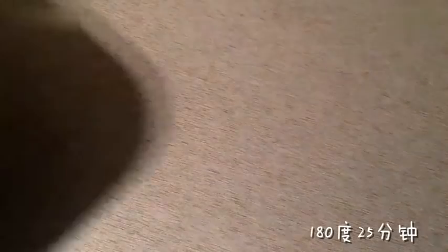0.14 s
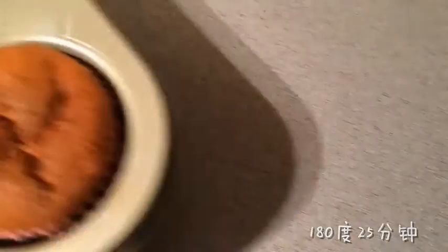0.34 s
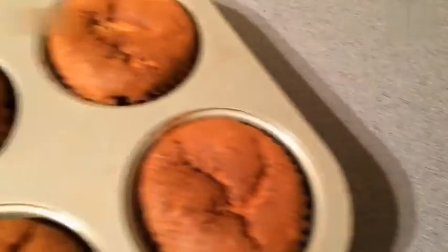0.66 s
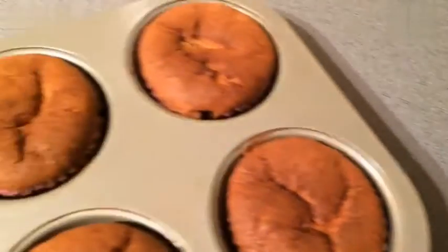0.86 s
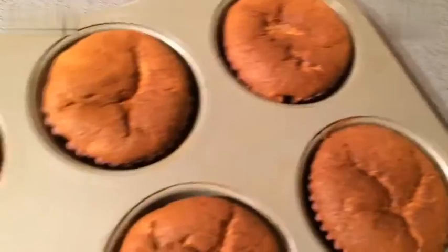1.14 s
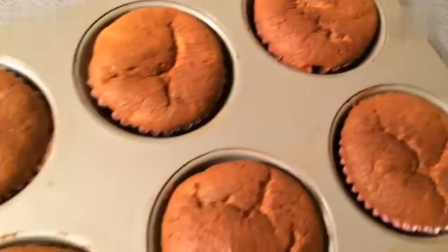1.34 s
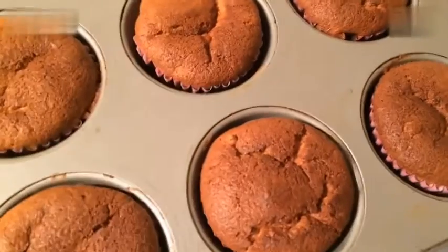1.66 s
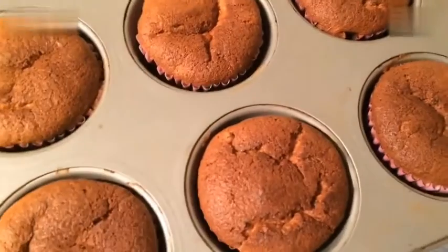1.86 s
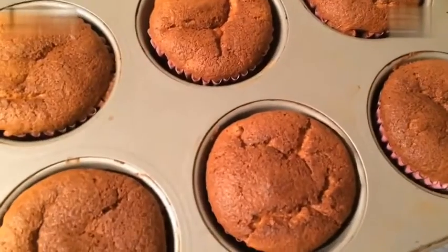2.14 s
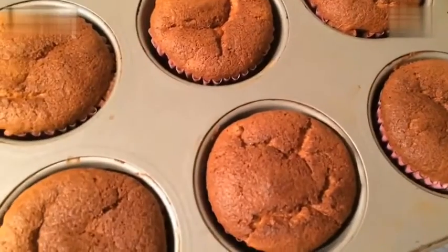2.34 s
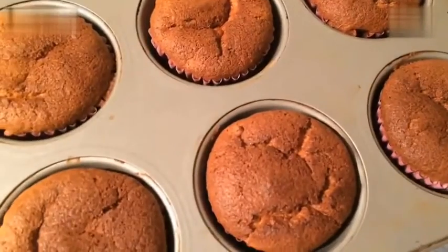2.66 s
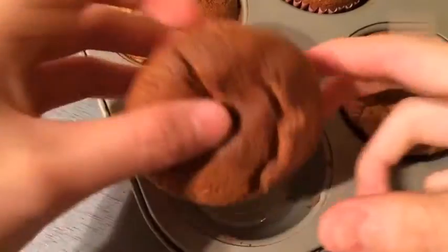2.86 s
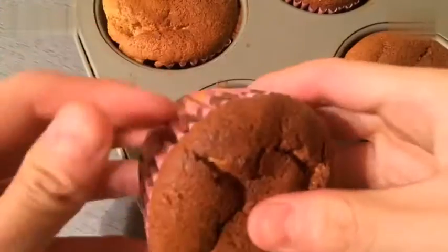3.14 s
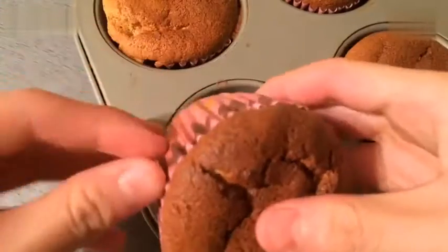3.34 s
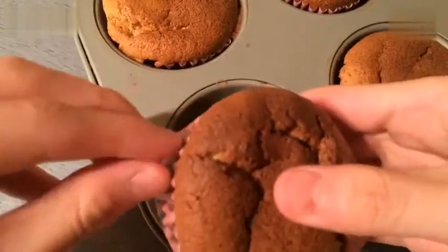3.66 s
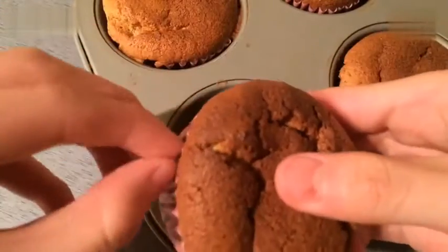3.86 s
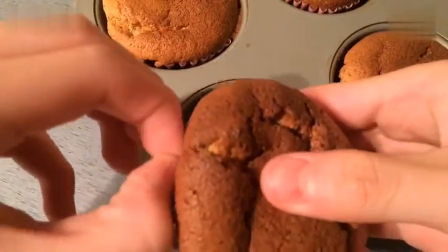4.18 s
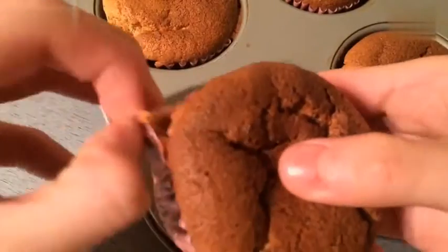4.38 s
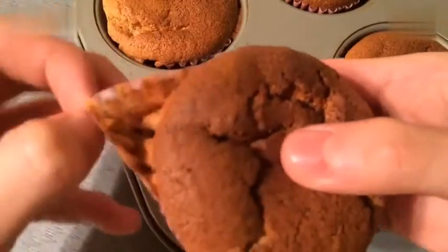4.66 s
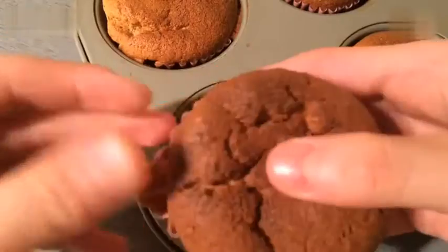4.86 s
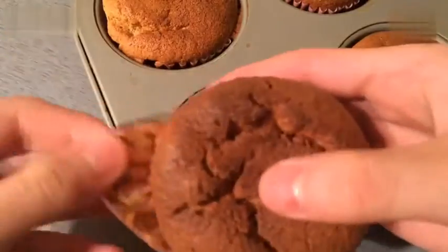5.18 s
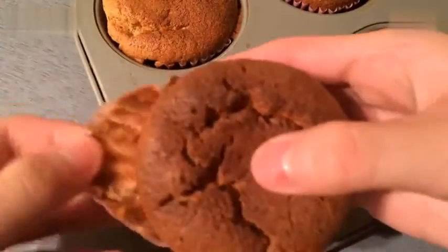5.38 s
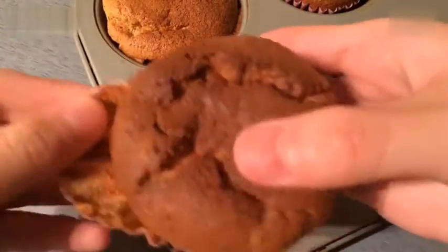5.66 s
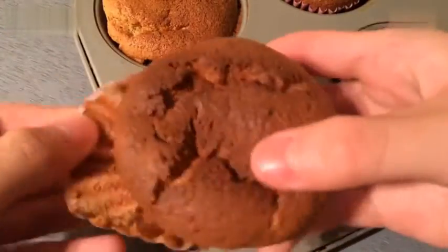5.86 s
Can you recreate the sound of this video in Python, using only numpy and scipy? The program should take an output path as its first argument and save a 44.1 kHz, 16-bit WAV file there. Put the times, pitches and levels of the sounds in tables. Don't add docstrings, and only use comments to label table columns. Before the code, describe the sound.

A quiet kitchen hum, low with faint appliance tones, runs throughout. At about 1.0 s a metal baking pan hits the counter with a hard, clanking knock, short rim ring and boomy slab, loud enough to distort the close microphone. Gritty scraping follows at once, with thin wavering sheet-metal ringing above it; a second clattering double knock comes at 1.34 s and the drag continues until about 1.9 s. A brief rustle and rumble lead to a third bang at 2.12 s, then a light nudge. Two soft low thumps fall around 2.6-2.7 s. From 2.8 to 4.1 s there are only faint paper brushes and tiny ticks. From 4.2 s dry ticks cluster and the liner peels in fizzing, crinkling pulls, with a firm crackling tear and thump at 4.94 s. Brighter snaps and short rips come at 5.3-5.6 s, then smaller crackles until about 5.9 s.

```python
import sys
import numpy as np
from scipy import signal
from scipy.fft import rfft, irfft, next_fast_len
from scipy.io import wavfile
from scipy.ndimage import uniform_filter1d, map_coordinates

SR = 44100
rng = np.random.default_rng(int(sys.argv[2]) if len(sys.argv) > 2 else 0)


def bounce(signal):
    frames = np.transpose(np.atleast_2d(signal))
    limited = np.clip(frames, -1, 1)
    pcm = np.round(limited * 32767).astype(np.int16)
    wavfile.write(sys.argv[1], SR, pcm)


def attenuation_scalar(level_db):
    decades = np.asarray(level_db, float) / 20
    return 10 ** decades


N = 265041

# pitch in Hz, level in dB, t60 in seconds.
COUNTER_MODES = [(42, -14, .2), (68, -10, 0.5), (114, -5, .3), (167, -9.5, .24), (197, -3, 0.38),
                 (325, -6, 0.24)]


def evened(x):
    return x / np.sqrt(np.mean(x ** 2) + 1e-20)


def coloured(x, points):
    hz, db = np.transpose(points)
    size = next_fast_len(len(x))
    f = np.fft.rfftfreq(size, 1 / SR)
    gain = attenuation_scalar(np.interp(np.log(f + 1), np.log(hz + 1), db))
    return irfft(rfft(x, size) * gain, size)[:len(x)]


def curve(rows, axis):
    rows = np.array(rows)
    return np.interp(np.arange(N) / SR, rows[:, 0], rows[:, axis], left=-150, right=-150)


def strokes(rows, axis, fall_db_per_s):
    t = np.arange(N) / SR
    levels = []
    for row in rows:
        full_s, let_go_s, rise_s = row[:3]
        rise_db = 20 * np.maximum(full_s - t, 0) / rise_s
        fall_db = fall_db_per_s * np.maximum(t - let_go_s, 0)
        levels.append(row[axis] - rise_db - fall_db)
    return np.max(levels, 0)


def resonate(x, hz, width_hz):
    return signal.lfilter(*signal.iirpeak(min(hz, .45 * SR), hz / width_hz, SR), x)


def ring(hz, t60, seconds):
    t = np.arange(round(seconds * SR)) / SR
    return attenuation_scalar(-60 * t / t60) * np.sin(2 * np.pi * hz * t)


def add(mix, s, sound):
    part = mix[round(s * SR):][:len(sound)]
    part += sound[:len(part)]


def grains(per_s, spread_db, clump_db):
    size = attenuation_scalar(spread_db * np.minimum(rng.exponential(1, N), 5)) * rng.standard_normal(N)
    clumps = evened(uniform_filter1d(rng.standard_normal(N), 200))
    return evened(size * (rng.random(N) < per_s / SR) * attenuation_scalar(clump_db * clumps))


def kitchen():
    # frequency in Hz, level in dB per Hz.
    hum_spectrum = [(12, -32.5), (20, -4), (58, -1), (91, -0.5), (164, -11), (184, -18.5), (304, -17),
                    (340, -14.5), (403, -15.5), (726, -21.5), (1310, -21), (2170, -25), (2360, -28),
                    (14600, -29), (16400, -58.5)]
    # pitch in Hz, width in Hz, level in dB.
    whine = [(168.7, 11, -71.5), (256.1, 6.9, -74.5), (302, 5.5, -73.5), (403.2, 6, -76.5)]
    # full at s, let go at s, rise in s per 20 dB, gain in dB.
    swell = [
        (1.6, 2.0, 1.1, 11.5),
    ]
    hum = attenuation_scalar(-59) * evened(coloured(rng.standard_normal(N), hum_spectrum))
    low = signal.lfilter(*signal.butter(1, 250, fs=SR), hum)
    swell_db = np.maximum(strokes(swell, axis=3, fall_db_per_s=19), 0)
    tones = sum(attenuation_scalar(db) * evened(resonate(rng.standard_normal(N), hz, width)) for hz, width, db in whine)
    return hum + (attenuation_scalar(swell_db) - 1) * low + tones


def slab_modes(count=260):
    # pitch in Hz, level in dB, t60 in seconds.
    slab = [(89.8, -15, 0.36), (199, -10, .32), (396, -4.5, .24), (602, -3.5, .15), (900, -3.5, 0.12),
            (1400, -8.5, 0.11), (2460, -16.5, .14), (3500, -30, .1), (6000, -34, .06)]
    f, db, t60 = np.transpose(slab)
    crowd = np.geomspace(f[0], f[-1], count) * rng.uniform(0.91, 1.03, count)
    small = [(hz, np.interp(hz, f, db) - 8.0, np.interp(hz, f, t60)) for hz in crowd]
    return np.array([attenuation_scalar(d) * ring(hz, t, seconds=.5) for hz, d, t in COUNTER_MODES + small])


def knocks():
    # time in s, peak in dB, rim pitch in Hz, boom in dB, tick in dB.
    blows = [(0.993, -41, 900, -10, -40), (1.003, -35.5, 900, -7, -41), (1.012, -26, 936.6, -10, -38.5),
             (1.0158, 9, 935, -15.5, -36), (1.041, -6.5, 730, -20.5, -43), (1.057, -16, 810, -14, -39),
             (1.3358, 6.5, 940, -11.5, -45.5), (1.3469, 4, 900, -25, -45), (1.3395, -6, 560, -14, -45),
             (1.372, -16.5, 540, -13, -41.5), (1.3787, -16.5, 785, -17.5, -34),
             (1.4305, -5, 900, -15.5, -50), (1.4335, -12.5, 783, -18, -45), (1.4608, -10, 760, -18, -48),
             (2.1196, -2.5, 902, -12, -52.5), (2.1249, 6.5, 880, -17, -37), (2.127, -5, 306.4, -4, -48),
             (2.1353, -13, 842.4, -19.5, -41.5)]
    out, modes = np.zeros(N), slab_modes()
    t = np.arange(modes.shape[1]) / SR
    for s, db, hz, boom_db, tick_db in blows:
        spot = rng.standard_normal(len(modes))
        t60 = .045 * attenuation_scalar(.6 * boom_db)
        sharp = attenuation_scalar(0.39 * min(db, 0))
        low_rim = ring(hz, t60, .1) + 0.35 * ring(hz * 1.5, 0.709 * t60, .1)
        high_rim = 0.16 * ring(hz * 2.2, t60, .1) + 0.045 * ring(hz * 3.4, 1.3 * t60, .1)
        rim = low_rim + sharp * high_rim
        add(out, s, attenuation_scalar(db) * rim * (1 - np.exp(-t[:len(rim)] / 0.00044)))
        weights = np.sign(spot) * attenuation_scalar(2.5 * spot[::-1])
        weights[:len(COUNTER_MODES)] = 1
        swing = 1 - np.exp(-t / 0.0034)
        add(out, s, attenuation_scalar(db + boom_db - 11.5) * (weights @ modes) * swing)
        add(out, s, attenuation_scalar(db + tick_db) * spot * np.exp(-t[:len(spot)] / 0.003))
    return out


def sheet_ringing(grit, pressure_db, start_s):
    # pitch in Hz, width in Hz, level in dB.
    pan_modes = [(2320, 78, 5), (2990, 70, 4.5), (4990, 110, 0.5), (5870, 71, -1.5), (6040, 60, -10.5),
                 (7340, 85, -1.5), (8580, 180, 3), (10000, 250, -3.5), (11900, 100, -7), (12700, 150, -4),
                 (13830, 200, -12.5)]
    # frequency in Hz, level in dB per Hz.
    sheen = [(2000, -29), (4000, -4.5), (9000, -3), (14400, -5.5), (16400, -30)]
    swells = uniform_filter1d(rng.standard_normal((len(pan_modes), N)), 6000)
    modes = np.zeros(N)
    for (hz, width, db), swell in zip(pan_modes, swells):
        tone = evened(resonate(resonate(grit, hz, 2 * width), hz, 1.15 * width))
        modes += attenuation_scalar(db + 2.8 * evened(swell)) * tone
    asleep = np.exp(-abs(np.arange(N) / SR - start_s) / .15)
    pace = 1 - .025 * asleep + .0025 * evened(uniform_filter1d(swells[0], 2000))
    bent = evened(map_coordinates(modes, [np.cumsum(pace)], mode="wrap"))
    sheet = bent + attenuation_scalar(-6.0) * evened(coloured(grit, sheen))
    extra_db = .35 * (pressure_db + 40)
    return attenuation_scalar(pressure_db + extra_db - 8 * asleep - 14) * sheet


def drag():
    # time in s, pressure in dB.
    pressure = [(1.0, -59), (1.03, -35.5), (1.2, -43), (1.34, -36.5), (1.52, -39.5), (1.68, -42.5),
                (1.8, -40), (1.895, -43), (1.935, -66)]
    # full at s, let go at s, rise in s per 20 dB, pressure in dB.
    nudges = [
        (1.96, 2.2, .05, -69),
        (2.22, 2.385, .1, -56),
        (2.481, 2.5, .004, -60),
    ]
    # frequency in Hz, level in dB per Hz.
    grit_spectrum = [(60, -32), (110, -9), (160, -23), (300, -10.5), (700, -4), (870, -1), (1050, -7.5),
                     (1300, -8.5), (1700, -16.5), (2300, -16), (3900, -36.5), (16400, -61)]
    grit = grains(20000, spread_db=1.5, clump_db=1.8)
    lumps = attenuation_scalar(0.96 * evened(uniform_filter1d(rng.standard_normal(N), 1500)))
    pressure_db = curve(pressure, axis=1)
    scrape_db = np.maximum(pressure_db, strokes(nudges, axis=3, fall_db_per_s=170))
    scrape = attenuation_scalar(scrape_db) * lumps * evened(coloured(grit, grit_spectrum))
    return scrape + sheet_ringing(grit, pressure_db, start_s=pressure[0][0])


def shift():
    # full at s, let go at s, rise in s per 20 dB, rustle in dB, rumble in dB.
    moves = [
        (1.93, 2.1, .01, -85, -48.5),
        (1.954, 1.975, .002, -52.5, -60),
        (1.98, 2.05, .05, -55, -60),
        (2.112, 2.128, .09, -51, -43.5),
        (2.482, 2.55, .004, -66, -95),
    ]
    # frequency in Hz, level in dB per Hz.
    rustle_spectrum = [(180, -29), (300, -9.5), (741, -5.5), (861, -2), (1680, -15), (1920, -19),
                       (8520, -16.5), (14300, -12.5), (16400, -45.5)]
    # pitch in Hz, width in Hz, level in dB.
    squeaks = [(2366, 50, -6), (3380, 40, -4), (3570, 60, -6), (4800, 80, -9.5)]
    rub = grains(15000, spread_db=0.0, clump_db=2.5)
    rings = sum(attenuation_scalar(db - 8.0) * evened(resonate(rub, hz, width)) for hz, width, db in squeaks)
    rustle = evened(coloured(rub, rustle_spectrum)) + rings
    rumble = evened(resonate(rng.standard_normal(N), 113, 40))
    rustle_gain = attenuation_scalar(strokes(moves, axis=3, fall_db_per_s=330))
    rumble_gain = attenuation_scalar(strokes(moves, axis=4, fall_db_per_s=330))
    return rustle_gain * rustle + rumble_gain * rumble


def snaps():
    # time in s, peak in dB, low part in dB, pitch in Hz.
    flips = [(1.951, -36, -10, 980), (3.1624, -53, -8, 1880), (3.8588, -51, -1, 1840),
             (4.156, -48, -9, 997), (4.211, -47, -8, 1340), (4.537, -42, -5, 1390), (4.6214, -49, 7, 1400),
             (4.6606, -50, -7, 2500), (4.8644, -47, -8, 2550), (4.9342, -39, 3, 1400),
             (4.9346, -50, 13, 330), (4.9356, -41, 0, 1400), (5.2524, -53, 1, 997), (5.2944, -33, -2, 2600),
             (5.2952, -42, 4, 1300), (5.3617, -34, 3, 3350), (5.3636, -27.5, -13, 1500),
             (5.4145, -38, 2, 1680), (5.4614, -44.5, 1, 1690), (5.4857, -41.5, -12, 1620),
             (5.5846, -42, -6, 1670), (5.607, -26.5, 1, 1650), (5.6075, -34, 6, 1050),
             (5.6235, -44.5, 2, 1640), (5.7518, -46, -2, 1570), (5.7599, -46, -7.5, 1480),
             (5.7743, -40, -1.5, 1524), (5.8132, -37, -6, 1150), (5.867, -49.5, -2, 1030)]
    # time in s, peak in dB.
    ticks = [(3.3744, -46.5), (4.1847, -47), (4.221, -44.5), (4.2429, -41), (4.264, -43), (4.297, -42),
             (4.3261, -41), (4.332, -41), (4.455, -43), (4.5824, -55), (5.5608, -47)]
    pleat = [(.6, .35), (1, 1), (2.0, .85)]
    out, t = np.zeros(N), np.arange(1500) / SR
    crack_band = signal.butter(1, [2500, 11000], "band", fs=SR)
    for s, db, low_db, hz in sorted(flips + [(s, db, -21, 2600) for s, db in ticks]):
        noise = signal.lfilter(*crack_band, rng.standard_normal(len(t)))
        crack = noise * np.exp(-t / .0006)
        afterslip = attenuation_scalar(-15) * noise * np.exp(-t / .009)
        add(out, s, attenuation_scalar(db) * (crack / abs(crack).max() + afterslip))
        body = sum(share * ring(hz * ratio, .009, .03) for ratio, share in pleat)
        body = signal.lfilter(*signal.butter(2, .45 * hz, "high", fs=SR), -body)
        add(out, s, attenuation_scalar(db + low_db + 2.5) * body)
    return out


def crumb_and_pleats():
    # frequency in Hz, level in dB per Hz.
    fizz_spectrum = [(1180, -8), (2000, -28), (2600, 1), (3020, -8), (3330, -3), (14300, 6.5), (15900, 1.5),
                     (16400, -34)]
    # pitch in Hz, width in Hz, level in dB.
    cup = [(1436, 57, 16), (1765, 30, 19), (2080, 110, 9.5), (3090, 62, 17.5), (2700, 60, 16),
           (5090, 100, 14)]
    fizz = evened(coloured(grains(16000, spread_db=1.9, clump_db=2.0), fizz_spectrum))
    coarse = grains(6000, spread_db=2.4, clump_db=2.4)
    crinkle = sum(attenuation_scalar(db) * evened(resonate(coarse, hz, width + 400)) for hz, width, db in cup)
    return fizz, evened(crinkle)


def peel(fizz, crinkle):
    # full at s, let go at s, rise in s per 20 dB, fizz in dB, low crinkle in dB.
    pulls = [(2.6, 2.605, .003, -58.5, -73), (3.15, 6.1, .3, -75, -77), (3.33, 3.49, .45, -69, -71),
             (4.2, 4.33, .14, -59, -73), (4.335, 4.345, .1, -66, -62), (4.37, 4.42, .05, -62, -75),
             (4.46, 4.525, .12, -54, -68), (4.538, 4.556, .004, -49, -49), (4.57, 4.66, .05, -56, -66),
             (4.67, 4.79, .08, -54, -58), (4.8, 4.88, .1, -61, -62), (4.975, 4.985, .05, -54, -63),
             (5.255, 5.31, .03, -62, -59), (5.365, 5.385, .008, -48.5, -51), (5.43, 5.505, .3, -53.5, -50),
             (5.74, 5.82, .07, -61, -59), (5.83, 5.88, .1, -63, -67)]
    fizz_gain = attenuation_scalar(strokes(pulls, axis=3, fall_db_per_s=300))
    crinkle_gain = attenuation_scalar(strokes(pulls, axis=4, fall_db_per_s=300))
    return fizz_gain * fizz + crinkle_gain * crinkle


def thumps():
    # time in s, peak in dB, pitch in Hz, t60 in seconds.
    pushes = [
        (2.609, -40, 76.4, 0.11),
        (2.713, -37.5, 80, 0.099),
        (4.419, -51, 70.0, 0.15),
        (4.618, -51, 81.6, 0.15),
        (4.936, -40, 122.4, 0.062),
        (5.293, -51, 85, 0.1),
    ]
    out = np.zeros(N)
    onset = 1 - np.exp(-np.arange(round(.4 * SR)) / SR / 0.017)
    for s, db, hz, t60 in pushes:
        add(out, s, attenuation_scalar(db + 8.0) * ring(hz, t60, .4) * onset)
    return out


def tears(fizz, crinkle):
    # start in s, end in s, level in dB, low crinkle in dB, brightest frequency in Hz.
    bursts = [(2.81, 2.85, -68.5, -10, 12500), (2.85, 2.9, -72, -15, 11050),
              (3.05, 3.072, -67.5, -0.5, 3600), (3.12, 3.158, -68, -7, 8000),
              (3.261, 3.317, -58.5, -3, 4600), (3.37, 3.388, -60, -17.5, 6240),
              (3.593, 3.614, -52.5, -13, 6000), (3.683, 3.75, -66, -5.5, 6000),
              (3.772, 3.788, -58.5, -8.5, 6000), (3.835, 3.867, -58, -7.5, 5500),
              (3.9, 3.921, -64, -2, 3980), (3.993, 4.035, -58.5, -10, 5000), (4.938, 4.975, -43, -3, 6700),
              (5.107, 5.162, -60, -6, 3800), (5.178, 5.213, -64.5, 1.5, 3820), (5.398, 5.414, -56, 3, 3500),
              (5.424, 5.438, -56, 5, 3500), (5.611, 5.63, -56.5, 6, 3990), (5.294, 5.299, -43, -11, 13000),
              (4.665, 4.668, -58, -2, 11000), (3.33, 3.44, -73, 2, 6500), (5.775, 5.818, -59, 1.5, 3500)]
    out = np.zeros(N)
    for start, end, db, low_db, hz in bursts:
        span = slice(round(start * SR), round(end * SR))
        edge = signal.windows.tukey(span.stop - span.start, .18)
        swell = np.linspace(.5, 1, len(edge)) ** 1.4
        bright = 0.52 * fizz[span] + 2.16 * resonate(fizz[span], hz, 0.29 * hz)
        add(out, start, edge * (attenuation_scalar(db + 2.5) * swell * bright + attenuation_scalar(db + low_db) * crinkle[span]))
    return out


def room(x, delay_s=0.002):
    # frequency in Hz, t60 in seconds.
    decay = [(60, .3), (250, .25), (1000, 0.29), (3000, 0.35), (8000, .2), (16000, .12)]
    hz, t, z = signal.stft(rng.standard_normal(SR // 2), SR, nperseg=256)
    f, t60 = np.transpose(decay)
    fade = attenuation_scalar(-60 * t / np.interp(hz, f, t60)[:, None])
    tail = signal.istft(z * fade, SR, nperseg=256)[1]
    tail[:round(delay_s * SR)] = 0
    return signal.fftconvolve(x, tail / np.linalg.norm(tail))[:N]


def scene():
    hum = kitchen()
    pan = knocks() + drag()
    fizz, crinkle = crumb_and_pleats()
    paper = shift() + snaps() + peel(fizz, crinkle) + tears(fizz, crinkle)
    wet = room(attenuation_scalar(-17.0) * pan + attenuation_scalar(-20.0) * paper)
    return (pan + paper + wet + thumps() + hum)[None]


def low_pass(x):
    return signal.sosfilt(signal.butter(12, 16520, fs=SR, output="sos"), x)


def record(dry):
    # frequency in Hz, gain in dB.
    mic = [(20, -11.5), (100, 2.5), (1000, 0), (5000, -0.5), (15400, -8), (16000, -12.5), (22050, -59.5)]
    x = np.clip(coloured(dry[0], mic), -1, 1)
    lowpass = signal.firwin(255, 16300, window=("kaiser", 9), fs=SR)
    x = signal.oaconvolve(x, lowpass, "same")
    return low_pass(x[None])


dry = scene()
out = record(dry)
bounce(out)
```